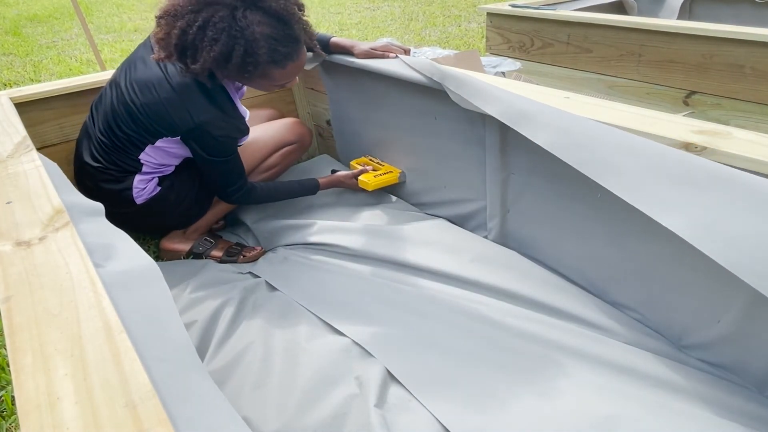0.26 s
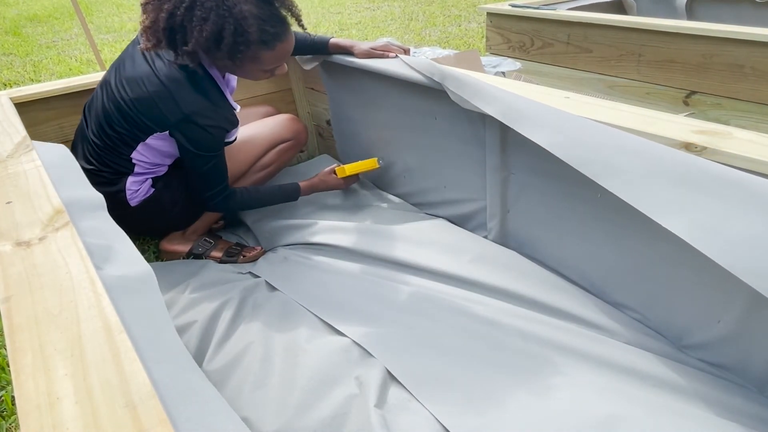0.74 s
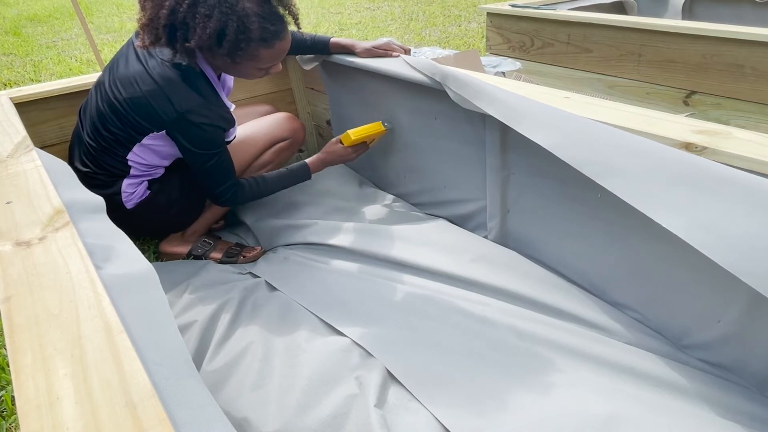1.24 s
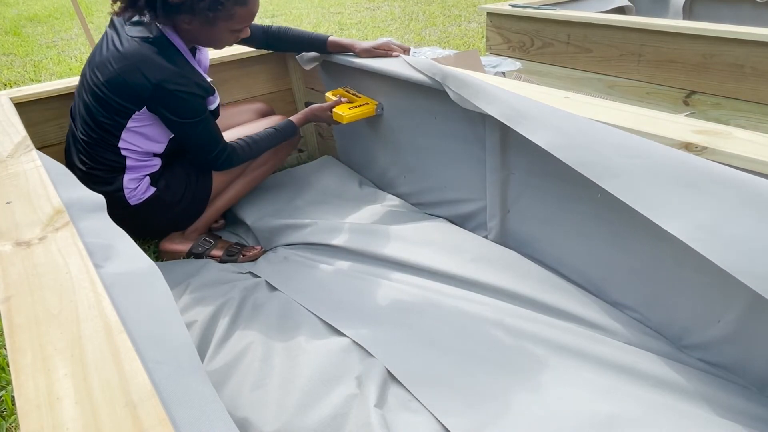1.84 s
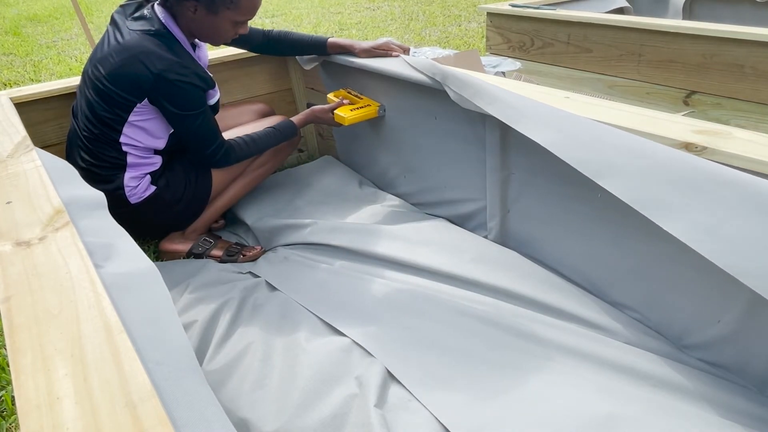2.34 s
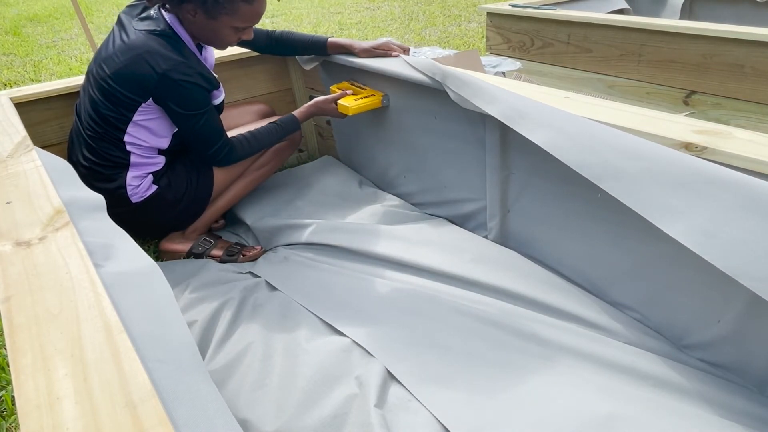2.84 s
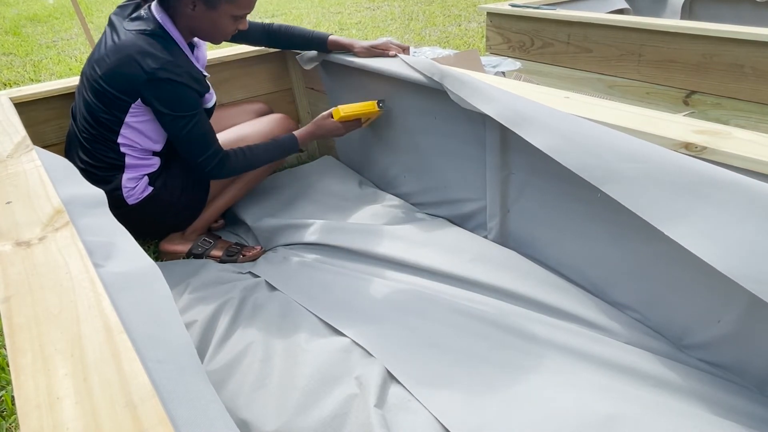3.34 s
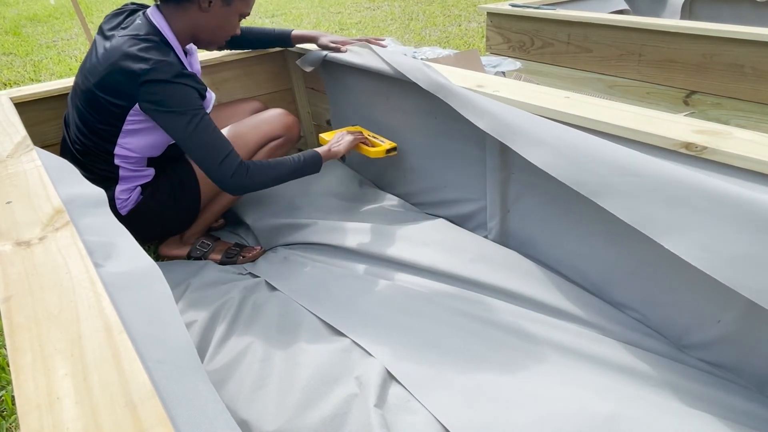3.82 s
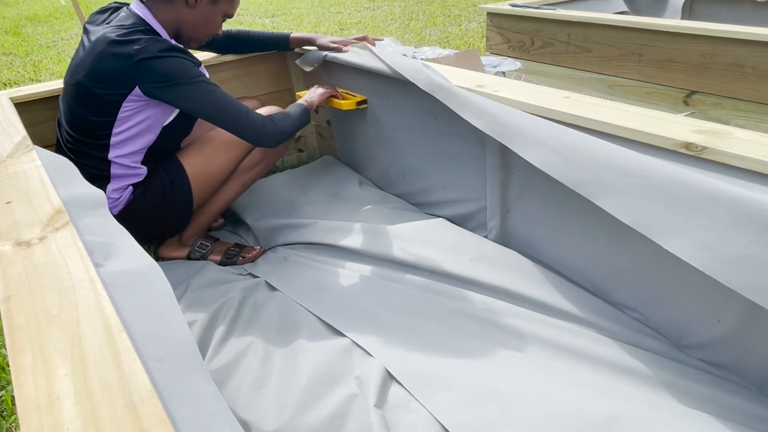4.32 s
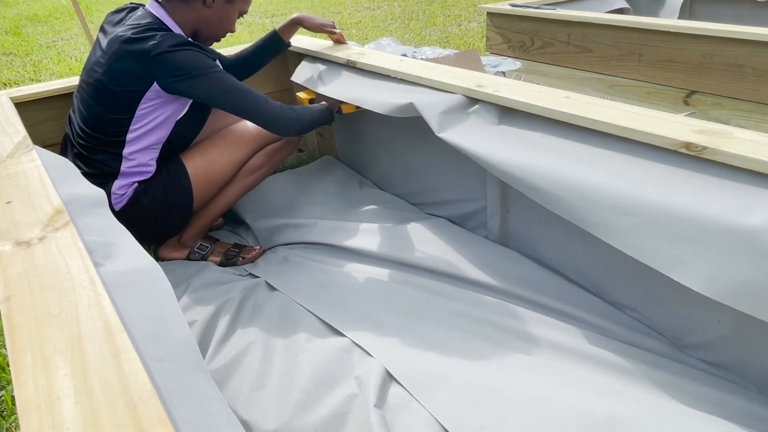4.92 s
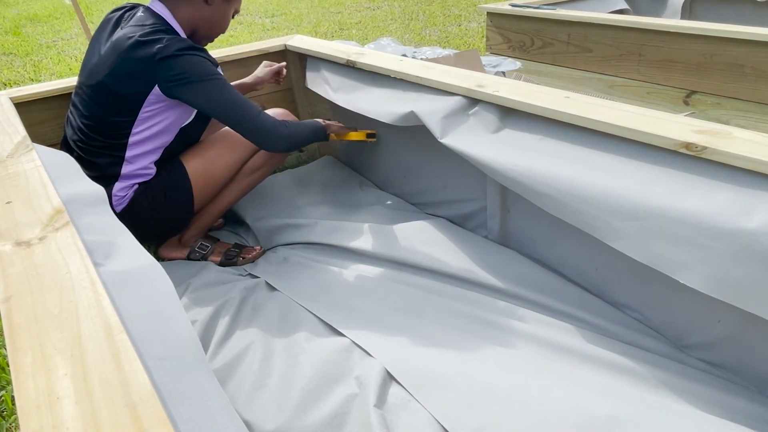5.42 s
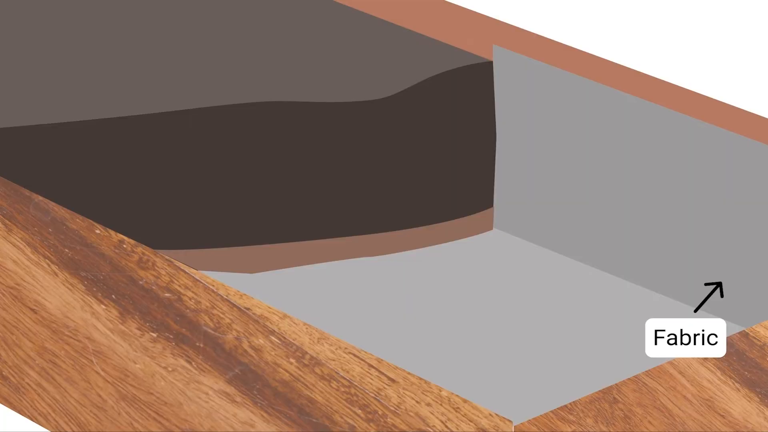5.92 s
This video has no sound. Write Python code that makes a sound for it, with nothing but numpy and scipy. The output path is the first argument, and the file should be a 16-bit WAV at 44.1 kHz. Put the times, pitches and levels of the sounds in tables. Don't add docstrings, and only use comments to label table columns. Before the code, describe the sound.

A staple gun shoots almost at once, followed by a solid wood knock and a metal click. A quieter stretch of small bumps follows, then a second shot with quick rattling contacts, soft rubs, and a third shot trailed by tiny clicks. Dry, close stereo microphones outdoors catch gusty low rumble; the sound stops suddenly near the end.

```python
import sys
import numpy as np
from scipy import signal
from scipy.fft import rfft, irfft
from scipy.io import wavfile

SR = 44100
rng = np.random.default_rng(int(sys.argv[2]) if len(sys.argv) > 2 else 0)


def attenuation_scalar(level_db):
    decades = np.asarray(level_db, float) / 20
    return 10 ** decades


def to_wav(s):
    ch = np.atleast_2d(s).T
    pcm = np.round(np.clip(ch, -1, 1) * 32767)
    wavfile.write(sys.argv[1], SR, pcm.astype(np.int16))


N = 272097
BURST_N = 13230


def band(x, low_hz, high_hz):
    high_hz = min(high_hz, .45 * SR)
    return signal.sosfilt(signal.butter(2, [low_hz, high_hz], "band", fs=SR, output="sos"), x)


def rms_one(x):
    return x / np.sqrt(np.mean(x ** 2) + 1e-20)


def peak_one(x):
    return x / np.abs(x).max()


def at_hz(points, hz):
    points_hz, values = np.transpose(points)
    return np.interp(np.log(hz), np.log(points_hz), values)


def add(track, s, sound):
    i = round(s * SR)
    track[i:i + len(sound)] += sound


def drift(rate):
    r = np.exp(-80 * np.pi * rate / SR)
    white = rng.standard_normal(N // 40 + 2002)
    slow = signal.lfilter([1], [1, -2 * r, r * r], white)[2000:]
    return np.interp(np.arange(N) / 40, np.arange(len(slow)), rms_one(slow))


def resonate(x, peaks):
    out = 0
    for k, (hz, width_hz, db) in enumerate(peaks):
        r = np.exp(-np.pi * max(width_hz, 20) / SR)
        feedback = [1, -2 * r * np.cos(2 * np.pi * hz / SR), r * r]
        ring = signal.lfilter([(1 - r * r) / 2, 0, (r * r - 1) / 2], feedback, x)
        out = out + (-1) ** k * attenuation_scalar(db) * ring
    return out


def rattle(lead_db, hold_ms, t60, spiky_db):
    t = np.arange(BURST_N) / SR - .015
    grit = rng.standard_normal(len(t)) * attenuation_scalar(spiky_db * rng.standard_normal(len(t)))
    lead = attenuation_scalar(lead_db + 1450 * t) * (t < 0) * band(grit, 300, 9000)
    onset = np.exp(np.minimum(t, 0) * 2200)
    decay = attenuation_scalar(-60 * np.maximum(t - hold_ms / 1000, 0) / t60)
    return lead + onset * decay * grit


def plank(hz, t60):
    t = np.arange(BURST_N) / SR
    swell = (1 - np.exp(-t * hz / 0.7)) ** 2
    return peak_one(np.sin(2 * np.pi * hz * t) * attenuation_scalar(-60 * t / t60) * swell)


# pitch_hz, level_db, t60_s
PLANK_MODES = [(123, -8.5, .16), (154.6, -2.5, 0.1), (210, 4.5, 0.097), (311.4, -1, 0.047),
               (412.5, 1.5, 0.038), (515, 2.5, 0.035), (639.8, -11, 0.042), (780, -3, 0.061)]


def boards(push_ms, stretch):
    t, rings = np.arange(BURST_N) / SR, 0
    for hz, db, t60 in PLANK_MODES:
        level_db = db + 5.0 * rng.standard_normal() - 60 * t / (t60 * stretch)
        swell = (1 - np.exp(-t * hz / 1.1)) * attenuation_scalar(level_db)
        rings = rings + swell * np.sin(2 * np.pi * (hz * t + rng.random()))
    push = np.hanning(int(push_ms * SR / 1000) + 3)
    return signal.fftconvolve(rings, push)[:len(t)]


# start_s, steel_peak_db, gun_body_db, rattle_ms, loudest_ring_hz
SHOTS = [
    (0.243, -8, -24, 6.6, 3091),
    (2.9748, -9, -19, 7.9, 3220),
    (4.7533, -7.5, -22.5, 9.8, 1410),
]
# pitch_hz, level_db
STAPLED_PLANKS = [(390, -19.5), (520, -17), (520, -19)]
# pitch_hz, level_db
SPRINGS = [(3440, -51), (2370, -55), (1600, -58)]
# pitch_hz, width_hz, level_db
STEEL = [(3110, 590, -0.5), (4980, 600, -5.5), (6610, 540, -2.5), (8120, 170, -5), (9500, 140, 6.5),
         (12500, 510, -6.5), (13217, 630, -8)]
# pitch_hz, width_hz, level_db
BODY = [(858, 150, 1), (1093, 150, -2.5), (1410, 600, -2.5), (1930, 660, 1.5), (2130, 550, 0)]
PLANK_T60_S, BOUNCE_S, BOUNCE_DB, BOUNCE_BOARDS_DB = .05, .018, -24, -8
BOARDS_UNDER_STEEL_DB = -15


def shots():
    out = np.zeros(N)
    rows = zip(SHOTS, STAPLED_PLANKS, SPRINGS)
    for (s, steel_db, body_db, ms, hz), (plank_hz, plank_db), (spring_hz, spring_db) in rows:
        crack = resonate(rattle(-15, ms, 0.013, spiky_db=9.0), STEEL)
        add(out, s - .015, attenuation_scalar(steel_db + 5.0) * peak_one(crack))
        sizzle = band(rattle(-19.5, ms, 0.005, spiky_db=0.5), 7000, 10000)
        sizzle_db = steel_db - 1.5 - hz / 700
        add(out, s - .015, attenuation_scalar(sizzle_db) * peak_one(sizzle))

        strike = rattle(-18, 1.3, 0.023, spiky_db=-3.5)
        ring = resonate(strike, [(hz, 320, 0)])
        add(out, s - .014, attenuation_scalar(steel_db + 1.0) * peak_one(ring))
        bounce = resonate(strike, [(spring_hz, 700, 0)])
        add(out, s - .015 + BOUNCE_S, attenuation_scalar(steel_db + BOUNCE_DB) * peak_one(bounce))

        add(out, s + 0.0029, attenuation_scalar(plank_db) * plank(plank_hz, PLANK_T60_S))
        body = resonate(rattle(-6.0, ms, 0.025, spiky_db=3.0), BODY)
        add(out, s - .013, attenuation_scalar(body_db + 11.0) * peak_one(body))
        thump = attenuation_scalar(steel_db + BOARDS_UNDER_STEEL_DB + 8.5) * peak_one(boards(1.0, stretch=.9))
        add(out, s + 0.0054, thump)
        add(out, s + 0.0054 + BOUNCE_S, attenuation_scalar(BOUNCE_BOARDS_DB) * thump)

        buzz = rattle(-39.0, 18.0, 0.57, spiky_db=-4.0)
        high_buzz = band(band(buzz, 6500, 12300), 6000, 12300)
        whole_buzz = band(buzz, 1200, 5900) + attenuation_scalar(-3.5) * high_buzz
        add(out, s - .008, attenuation_scalar(steel_db - 34.5) * peak_one(whole_buzz))
        add(out, s - .008, attenuation_scalar(spring_db) * peak_one(resonate(buzz, [(spring_hz, 70, 0)])))
    return out


# start_s, peak_db, board_pitch_hz, hard_edge_db
KNOCKS = [(0.027, -24, 307, -45), (0.125, -34, 302.7, -58), (0.421, -12.5, 210, -38),
          (0.575, -49, 171.5, -76.5), (1.485, -28, 181.8, -58), (1.616, -36, 195, -77),
          (2.332, -32.5, 119.5, -74), (2.376, -42, 171.5, -53), (2.613, -28, 172.8, -56),
          (3.17, -15.5, 232, -27.5), (3.869, -27, 193, -50), (4.111, -36.5, 172.3, -59),
          (4.616, -44.5, 189, -64), (4.976, -32.5, 508, -33.5)]
KNOCK_T60_S = .047
SOFTNESS_MS_PER_DB = .13


def knocks():
    out = np.zeros(N)
    for s, db, hz, edge_db in KNOCKS:
        push_ms = max(SOFTNESS_MS_PER_DB * (db - edge_db - 17.5), .8)
        nearest = plank(hz, KNOCK_T60_S)
        neighbours = attenuation_scalar(6) * peak_one(boards(push_ms, stretch=1.3))
        add(out, s, attenuation_scalar(db) * peak_one(nearest + neighbours))
        edge = band(rattle(-28, 1.2, 0.086, spiky_db=0.5), 480, 1000)
        add(out, s - .015, attenuation_scalar(edge_db + 7.0) * peak_one(edge))
    return out


# start_s, peak_db, ring_hz, body_db
CLICKS = [(0.1962, -44, 6200, -49), (0.4022, -42, 3360, -51), (0.4219, -35, 2970, -48),
          (0.4742, -18.5, 4350, -29.5), (0.7513, -56.5, 10000, -65), (1.2972, -44, 4420, -50.5),
          (2.2252, -55.5, 3500, -56), (2.2558, -49, 3160, -53), (2.375, -52.5, 3870, -66.5),
          (2.9184, -35, 6130, -45.5), (3.1357, -32.5, 3250, -47.5), (3.1677, -16.5, 7660, -23),
          (3.8658, -34.5, 3330, -42), (4.0002, -44.5, 2980, -60), (4.0514, -43, 2500, -66),
          (4.1764, -48.5, 2530, -76), (4.9347, -39.5, 5246, -55), (4.9725, -40, 2880, -37.5),
          (5.013, -45.5, 9100, -52), (5.0338, -45.5, 10100, -46), (5.046, -38.5, 7100, -49),
          (5.0854, -42.5, 10900, -59), (5.245, -49.5, 3260, -67.5), (5.3218, -36, 2930, -37)]
# start_s, peak_db, ring_hz, body_db
MORE_CLICKS = [(.029, -50, 3200, -71), (.130, -55, 3550, -57), (.219, -58, 9500, -58.5),
               (.322, -58.5, 1456, -58.5), (.496, -75.5, 6995, -72), (3.127, -55.5, 9000, -64),
               (4.721, -52, 4114, -51.5), (4.746, -39.5, 10470, -29), (4.954, -42.5, 9000, -46.5)]
CLICK_T60_S, MORE_CLICKS_T60_S, HANDLE_HZ = 0.041, .038, 1800


def clicks():
    out = np.zeros(N)
    contacts = [(*c, CLICK_T60_S) for c in CLICKS] + [(*c, MORE_CLICKS_T60_S) for c in MORE_CLICKS]
    for s, db, hz, body_db, t60 in contacts:
        spit = rattle(-19.0, 0.97, t60, spiky_db=0.0)
        spit = signal.sosfilt(signal.butter(4, 13300, fs=SR, output="sos"), spit)
        bright = resonate(spit, [(hz, 700, 2.5)])
        bright = bright + attenuation_scalar(-5.5) * resonate(spit, STEEL) + attenuation_scalar(-4.5) * band(spit, 2600, 15000)
        add(out, s - .015, attenuation_scalar(db) * peak_one(bright))
        body = resonate(spit, [(HANDLE_HZ, 300, 3)]) + attenuation_scalar(-4.5) * resonate(spit, BODY)
        add(out, s - .015, attenuation_scalar(body_db + 5.5) * peak_one(body))
    return out


# start_s, end_s, peak_db
SLIPS = [(3.98, 4.095, -61.5), (5.005, 5.09, -50.5), (.32, .328, -52.5)]
SLIPS_PER_S, SLIP_JITTER = 95, 0.095
SLIP_HZ, SLIP_SPREAD_HZ, SLIP_SPREAD_DB = 1710, 54, 4.5


def slips():
    even = [(s, db) for start, end, db in SLIPS for s in np.arange(start, end, 1 / SLIPS_PER_S)]
    uneven = []
    for (s, db), (a, b, c) in zip(even, rng.standard_normal((40, 3))):
        slip_s = s + SLIP_JITTER * a / SLIPS_PER_S
        uneven.append((slip_s, db + SLIP_SPREAD_DB * b, SLIP_HZ + SLIP_SPREAD_HZ * c))
    return uneven


# start_s, length_s, boards_db, fabric_db
RUBS = [(2.194, 0.086, -55, -56), (3.02, 0.044, -53.5, -63), (3.88, 0.017, -43, -49.5),
        (3.93, 0.28, -48, -60), (4.98, 0.015, -45, -47), (5.026, 0.045, -41, -49.5)]
# pitch_hz, width_hz, level_db
RUB_PEAKS = [(140, 50, 6.5), (205, 58, 7), (327, 54, -2.5)]
# pitch_hz, width_hz, level_db
SCUFF = [(520, 74, 1), (793.6, 150, -7.5), (1200, 240, -1.5)]
RUB_ATTACK_S, RUB_RELEASE_DB_PER_S = 0.004, 156.5


def rubs():
    t, level, out = np.arange(N) / SR, np.zeros((2, N)), np.zeros(N)
    for s, length, *db in RUBS:
        release = attenuation_scalar(-RUB_RELEASE_DB_PER_S * np.maximum(t - s - length, 0))
        stroke = np.clip((t - s) / RUB_ATTACK_S, 0, 1) * release
        level += attenuation_scalar(np.array(db))[:, None] * stroke
    grains = rng.standard_normal(N) * attenuation_scalar(3.5 * drift(60) + 2.5 * rng.standard_normal(N))
    for s, db, hz in slips():
        slip = resonate(rattle(-34, 4.2, 0.042, spiky_db=-0.5), [(hz, 130, 0)])
        add(out, s - .015, attenuation_scalar(db + 6.5) * peak_one(resonate(slip, [(1780, 310, 0)])))
    through_boards = rms_one(band(resonate(grains, RUB_PEAKS), 100, 520))
    through_fabric = rms_one(band(resonate(grains, SCUFF), 350, 930))
    return out + level[0] * through_boards + level[1] * through_fabric


# pitch_hz, left_right_likeness
LIKENESS = [(60, 0.87), (130, 0.9), (290, 0.37), (640, -0.26), (1410, -0.49), (3100, 0.69), (6820, 0.08),
            (15000, 0.69)]


def banded_noise(spectrum, low_hz, octaves, patchy_db, count=3, unlike=0):
    out, together = 0, drift(1.7)
    edges = low_hz * 2 ** np.arange(0, octaves, 1 / count)
    white = rng.standard_normal((2, 2, N))
    for k, (low, high) in enumerate(zip(edges, edges[1:])):
        mid, side = band(white[k % 2], low, high)
        hz = np.sqrt(low * high)
        alike = np.clip(at_hz(LIKENESS, hz) - unlike, -.95, .95)
        gain = attenuation_scalar(at_hz(spectrum, hz) + patchy_db * (.3 * together + drift(25)))
        out = out + gain * (np.sqrt(1 + alike) * mid + np.sqrt(1 - alike) * side * [[1], [-1]])
    return rms_one(out)


# time_s, level_db
WIND = [(0.0, -54), (0.46, -50), (0.6, -53.5), (1.16, -60), (1.38, -56), (1.8, -56.5), (2.15, -50.5),
        (2.45, -38.5), (2.6, -44), (3.0, -51), (3.24, -42), (3.42, -50.5), (3.65, -45.5), (4.4, -48.5),
        (4.6, -45.5), (4.96, -46), (5.25, -44), (5.6, -46)]
# pitch_hz, density_db
RUMBLE = [(12, -49), (20, -24), (46, -3.5), (65, 8), (79, 4), (200, -18), (260, -49), (440, -120)]
# pitch_hz, density_db
AIR = [(65, -29), (110, 1), (163, -11), (230, -5), (255, -10.5), (331, -13.5), (405, -16.5), (625, -16),
       (765, -10), (979, -14.5), (1510, -26), (3500, -32.5), (4550, -62), (7700, -120)]
# pitch_hz, density_db
HISS = [(820, -31), (1400, -2.5), (2050, -1), (2670, -2), (2880, -5), (3380, -6), (4940, -13.5), (6440, -8),
        (7500, -18), (8560, -18), (9600, -9.5), (10700, -22), (12200, -21.5), (12700, -40), (13500, -60)]
RUMBLE_TRIM_DB, AIR_DB, HISS_DB = 0.85, -53.5, -71
AIR_FOLLOWS = .05


def outdoors():
    wind_db = np.interp(np.arange(N) / SR, *np.transpose(WIND))
    rumble_db = wind_db + RUMBLE_TRIM_DB + [[.9], [-.9]]
    rumble = attenuation_scalar(rumble_db) * banded_noise(RUMBLE, 22, 3.0, patchy_db=2.2, unlike=.4)
    air_db = AIR_DB + AIR_FOLLOWS * (wind_db - wind_db.mean())
    air = attenuation_scalar(air_db) * banded_noise(AIR, 120, 3.7, patchy_db=2.0)
    hiss_db = HISS_DB + np.array([[2.4], [3.6]])
    hiss = attenuation_scalar(hiss_db) * banded_noise(HISS, 1520, 3.2, patchy_db=.7, count=7)
    return rumble + air + hiss


# pitch_hz, phase_radians
LEFT_PHASE = [(60, 0), (200, -0.82), (500, -0.7), (720, -2), (1000, -5.5), (1400, -5), (2400, -5),
              (4000, -5), (5000, -6.5), (7700, -4.5), (9500, -9), (11700, -16), (14500, -14)]
# pitch_hz, level_db
LEFT_GAIN = [(60, 1), (110, 5), (200, 0), (380, -2.5), (700, 7), (1290, -1), (2380, 0), (4400, 4),
             (8120, -5), (15000, -0.5)]
# delay_s, left_db, right_db
ECHOES = [(.0017, -15, -11.5), (.0032, -11, -15), (.0063, -17.5, -17), (0.0206, -14.5, -24),
          (0.033, -34.5, -40), (.052, -36, -31)]


def microphones(x):
    x = signal.sosfilt(signal.butter(3, [105, 14200], "band", fs=SR, output="sos"), x)
    hz = np.arange(1, N // 2 + 2) * SR / N
    half = attenuation_scalar(at_hz(LEFT_GAIN, hz) / 2) * np.exp(.5j * at_hz(LEFT_PHASE, hz))
    out = np.array([irfft(rfft(x) * half, N), irfft(rfft(x) / half, N)])
    top = signal.butter(4, 13300, "high", fs=SR, output="sos")
    out -= 0.55 * signal.sosfilt(top, out[:, ::-1])[:, ::-1]
    dull = signal.lfilter([.3], [1, -.7], x)
    for s, left_db, right_db in ECHOES:
        out[0] += attenuation_scalar(left_db) * np.roll(dull, round((s + 0.00088) * SR))
        out[1] += attenuation_scalar(right_db) * np.roll(dull, round(s * SR))
    return out


LIMIT_DB, LIMIT_SHARE, LIMIT_ATTACK_S, LIMIT_RELEASE_DB_PER_S = -9.5, 0.57, 0.018, 45


def gain_control(x):
    climb = LIMIT_RELEASE_DB_PER_S * np.arange(N) / SR
    peak_db = 20 * np.log10(np.abs(x).max(axis=0) + 1e-9)
    over_db = LIMIT_SHARE * np.maximum(peak_db - LIMIT_DB, 0)
    held_db = np.maximum.accumulate(over_db + climb) - climb
    r = np.exp(-1 / (LIMIT_ATTACK_S * SR))
    return x * attenuation_scalar(-signal.lfilter([1 - r], [1, -r], held_db))


def scene():
    work = shots() + knocks() + clicks() + rubs()
    return microphones(work) + outdoors()


def roll_off(x):
    return signal.sosfilt(signal.butter(12, 16440, fs=SR, output="sos"), x)


CUT_S, HISS_S = 5.744, 6.144


def record(dry):
    t = np.arange(N) / SR
    hiss = band(rng.standard_normal(N), 194, 5300) * np.clip((t - HISS_S) / .022, 0, 1)
    work = np.tanh(gain_control(dry)) * np.clip((CUT_S - t) / 0.001, 0, 1)
    return roll_off(work + attenuation_scalar(-62.0) * hiss)


dry = scene()
out = record(dry)
to_wav(out)
```